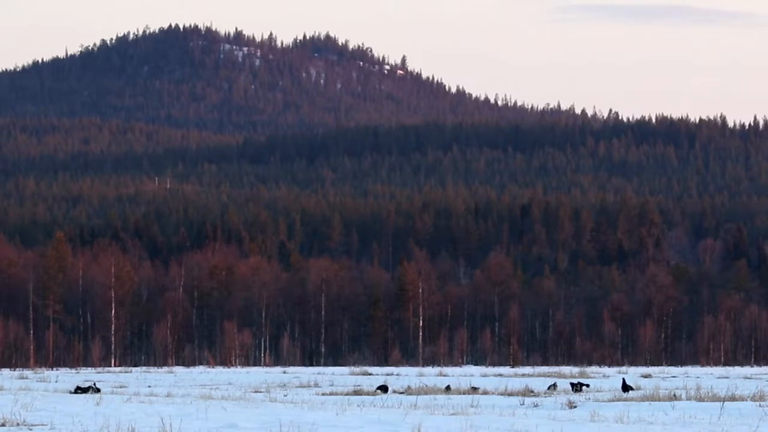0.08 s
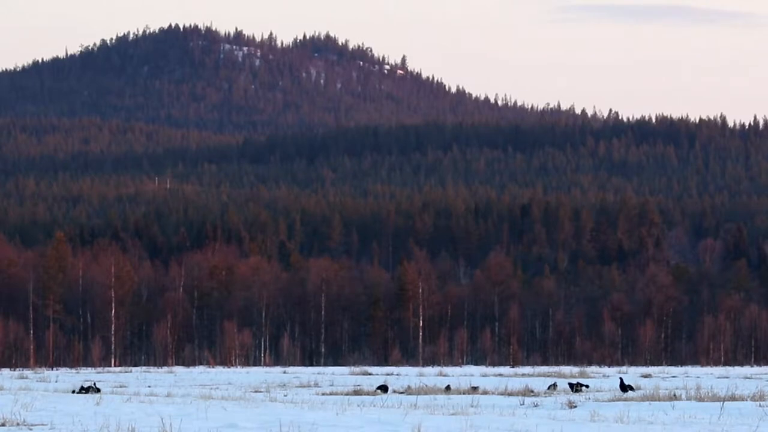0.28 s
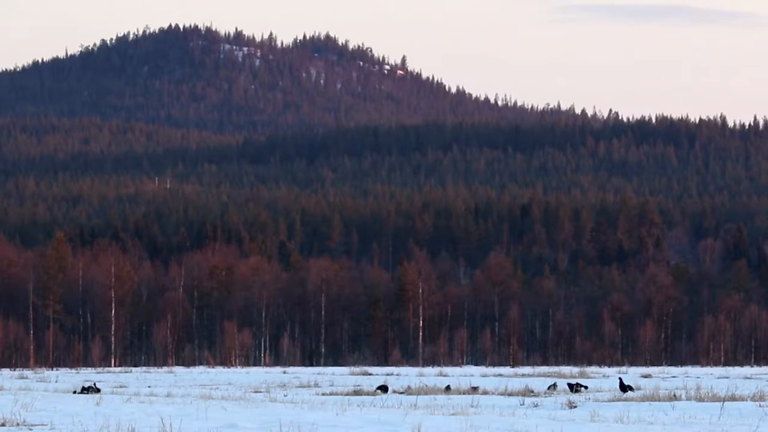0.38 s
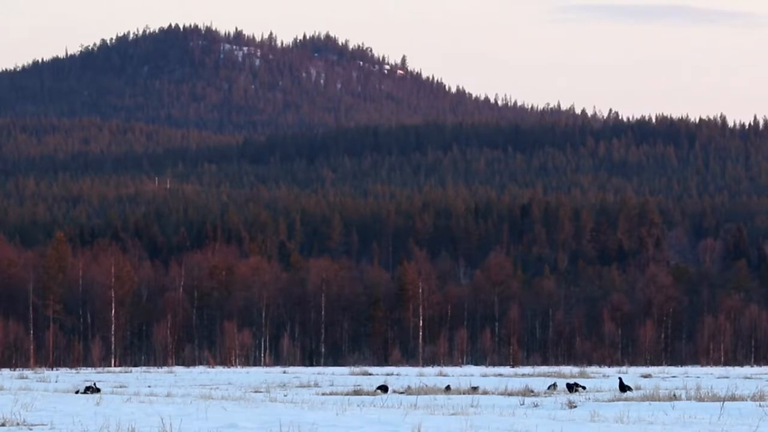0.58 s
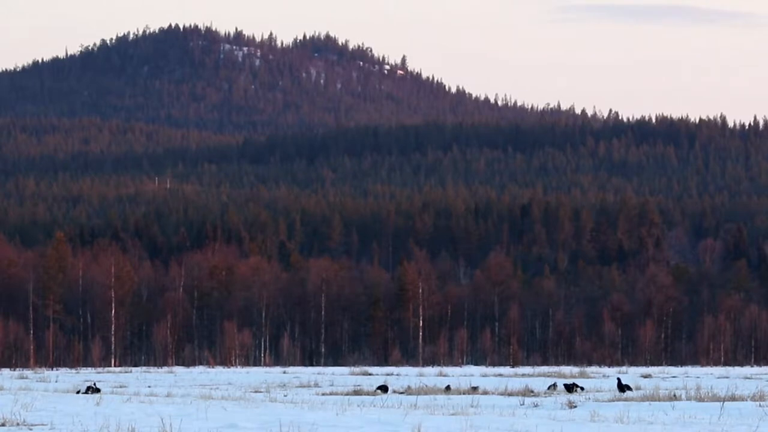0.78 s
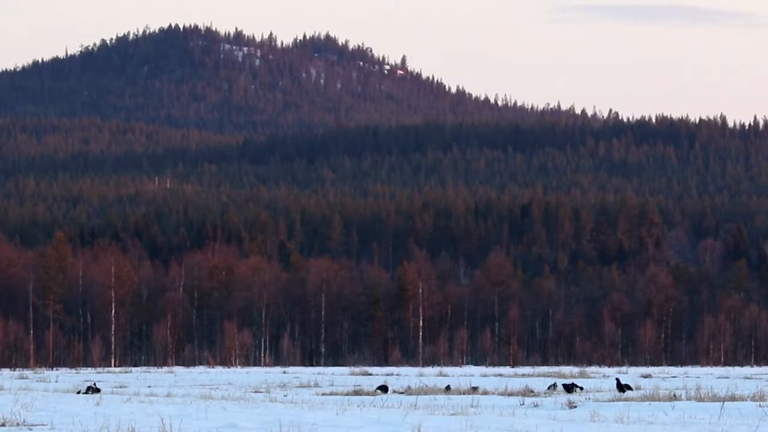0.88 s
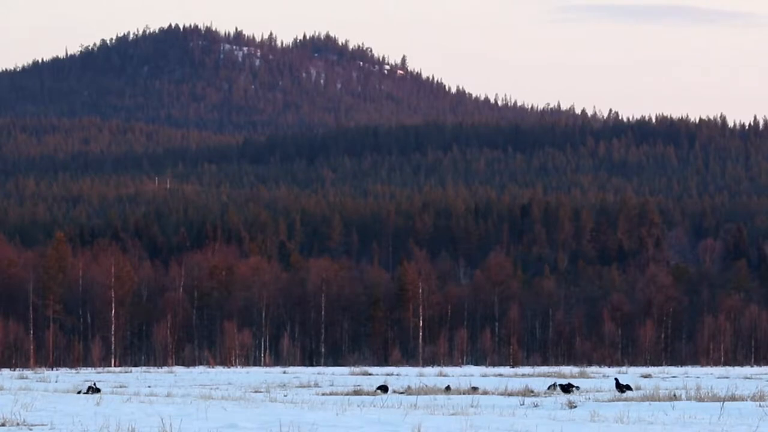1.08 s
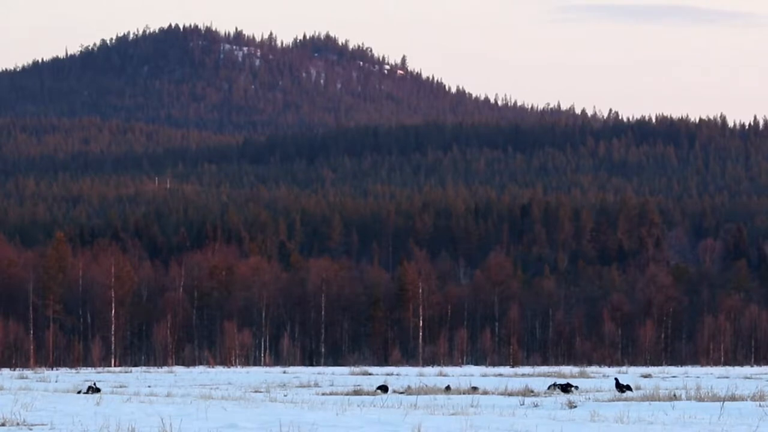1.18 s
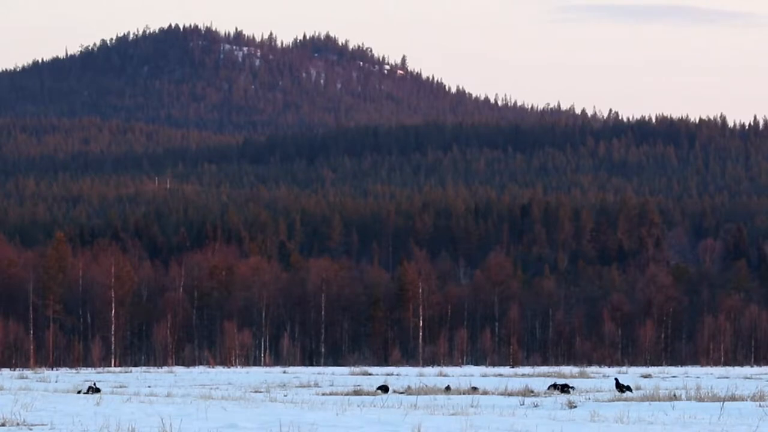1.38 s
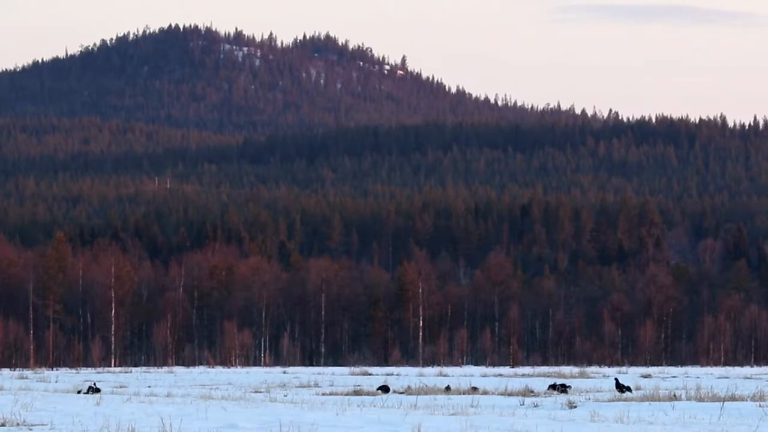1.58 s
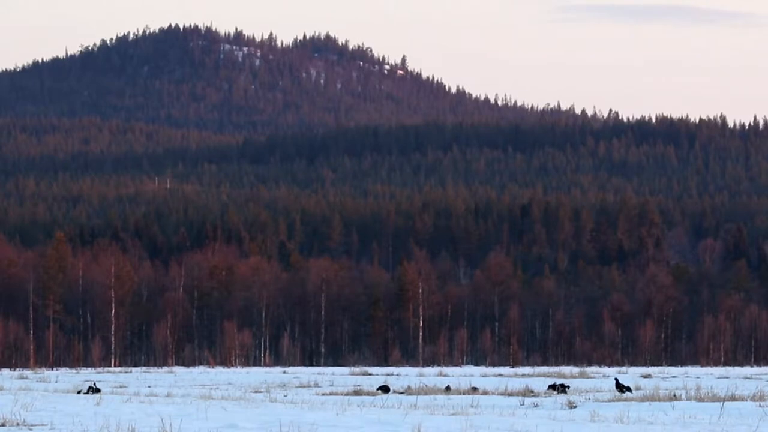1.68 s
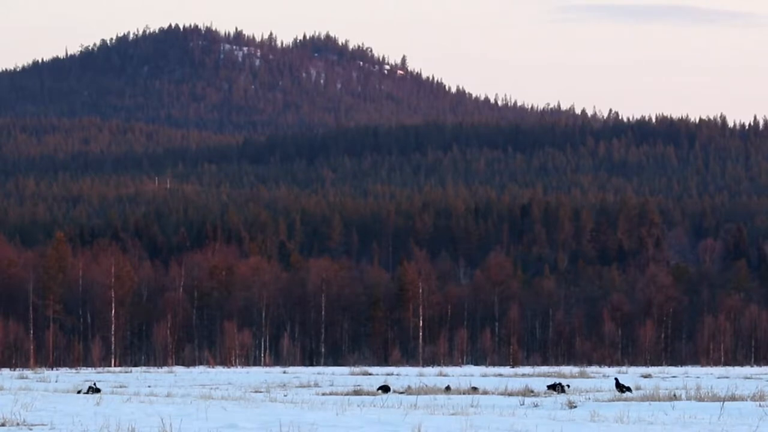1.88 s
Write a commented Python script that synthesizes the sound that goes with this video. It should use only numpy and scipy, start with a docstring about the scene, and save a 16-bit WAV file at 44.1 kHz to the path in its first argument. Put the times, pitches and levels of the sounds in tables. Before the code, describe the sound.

A male black grouse's hissing sneeze bursts in at 0.2 s, a rough breathy whistle sliding down and fading by 0.45 s, then swelling and climbing from 0.55 s, ending near 1.05 s. Throughout, another cock bubbles in short, low, pure coos, roughly fourteen a second, clearer and slightly stronger after 1.3 s. Random distant bubbling, faint far hisses near 0.1 and 1.3 s, low rumble, microphone hiss and soft forest echo.

```python
"""A black grouse cock gives a two-part hissing sneeze on a bog: a breathy, wavering whistle falls,
fades and climbs again, while three bands of shaped noise make the rush of air in his throat.
Another cock bubbles on in short gliding coos, each nearly a pure tone, with more birds behind at random.
Faint puffs of hiss come from afar. Filtered noise makes the low rumble, a far wash of hissing cocks
and steady microphone hiss; smeared noise echoes stand for the forest edge."""
import sys
import numpy as np
from scipy import signal
from scipy.fft import rfft, irfft
from scipy.io import wavfile

SR = 44100
rng = np.random.default_rng(int(sys.argv[2]) if len(sys.argv) > 2 else 0)


def waveform_to_disk(signal):
    """Save audio, clipped to [-1, 1], as 16-bit WAV at the path in sys.argv[1]."""
    frames = np.transpose(np.atleast_2d(signal))
    scaled = np.clip(frames, -1, 1) * 32767
    samples = np.round(scaled).astype(np.int16)
    wavfile.write(sys.argv[1], SR, samples)


N = 83790
TIME, BINS = np.arange(N) / SR, np.fft.rfftfreq(N, 1 / SR)


def amp(db):
    """Turns decibels into a gain."""
    return 10 ** (np.asarray(db) / 20)


def unit(x):
    """Scales a sound to an average (rms) strength of 1."""
    return x / np.sqrt(np.mean(abs(x) ** 2) + 1e-20)


def curve(table, axis):
    """Draws straight lines through one column of a time table, at every sample."""
    rows = np.array(table)
    return np.interp(TIME, rows[:, 0], rows[:, axis])


def colour(table, axis=1):
    """Joins one column of a frequency table on a log scale, at every frequency bin."""
    rows = np.array(table)
    return np.interp(np.log(BINS + 1), np.log(rows[:, 0] + 1), rows[:, axis])


def noise(table):
    """Random noise filtered to the table's balance of frequencies, at rms 1."""
    spectrum = rfft(rng.standard_normal(N))
    return unit(irfft(spectrum * amp(colour(table)), N))


def wander(hz):
    """A smooth random curve that moves at up to about hz, at rms 1."""
    spectrum = rfft(rng.standard_normal(N))
    return unit(irfft(spectrum / (1 + (BINS / hz) ** 2), N))


def turning(hz):
    """A complex wave of size 1 that turns at the given frequency, fixed or changing."""
    return np.exp(2j * np.pi * np.cumsum(hz * np.ones(N)) / SR)


def swell(middle, length):
    """A rounded rise and fall, silent outside its length in seconds."""
    return np.cos(np.pi * np.clip((TIME - middle) / length, -.5, .5))


ECHO_T60_S = 4  # time for the echo to fade by 60 dB


def forest(x):
    """The forest edge's diffuse echo: the sound smeared by fading noise, different on each side."""
    fade = amp(-60 * TIME / ECHO_T60_S)
    rise = np.minimum(TIME / 0.017, 1)
    tail = rng.standard_normal((2, N)) * fade * rise
    return signal.fftconvolve(x[None], tail / np.linalg.norm(tail[0]), axes=1)[:, :N]


# tone balance of the low outdoor rumble: (frequency [Hz], relative level per Hz [dB])
RUMBLE_COLOUR = [(15, 0.5), (35, -6), (60, 1.5), (110, -3), (200, -3), (300, 0), (450, 0), (700, -14),
                 (1000, -16.5), (1500, -16), (2200, -37), (5000, -46)]
# tone balance of each microphone's hiss: (frequency [Hz], relative level per Hz [dB])
HISS_COLOUR = [(20, 2), (100, 8), (400, 7.5), (1000, 4), (2500, -1), (5000, -1), (7000, 0), (9000, -2),
               (15500, -2)]
# tone balance of the far-off wash of other cocks hissing: (frequency [Hz], relative level per Hz [dB])
WASH_COLOUR = [(700, -32), (1050, -7), (1250, 4), (1430, 6), (1700, -5), (2000, -19), (2800, -24),
               (4000, -29)]
RUMBLE_DB, HISS_DB, WASH_DB = -40.5, -38.5, -48.5
RUMBLE_SIDE_DB = -18.5  # left-right difference, relative to the shared rumble


def background():
    """Steady filtered noise: a nearly mono rumble, with separate wash and hiss on each side."""
    side_rumble = noise(RUMBLE_COLOUR) * np.array([[1], [-1]])
    rumble = noise(RUMBLE_COLOUR) + amp(RUMBLE_SIDE_DB) * side_rumble
    hiss_and_wash = [amp(HISS_DB) * noise(HISS_COLOUR) + amp(WASH_DB) * noise(WASH_COLOUR)
                     for side in range(2)]
    return amp(RUMBLE_DB) * rumble + np.array(hiss_and_wash)


COO_JITTER, COO_OVERTONE_DB = .012, -30  # pitch wobble [fraction], level against the main tone


def coo(middle, length, hz, glide, db):
    """One nearly pure gliding note from the swollen throat, with a faint overtone at twice the pitch."""
    out = np.zeros(N)
    on = abs(TIME - middle) < length / 2
    t = TIME[on] - middle
    jitter = np.interp(t, np.linspace(-length / 2, length / 2, 8), rng.standard_normal(8))
    pitch = hz * 2 ** (glide * t) * (1 + COO_JITTER * jitter)
    phase = 2 * np.pi * (rng.random() + np.cumsum(pitch) / SR)
    tone = np.sin(phase) + amp(COO_OVERTONE_DB) * np.sin(2 * phase)
    out[on] = np.sqrt(2) * amp(db) * np.cos(np.pi * t / length) ** 1.45 * tone
    return out


# the near bird's coos:
# (middle time [s], length [s], pitch at the middle [Hz], glide [octaves/s], level before COO_DB [dB])
COO_NOTES = [(0.013, 0.038, 475.3, 13.5, -27), (.04, 0.031, 551, -3.5, -32.5),
             (.066, 0.028, 466, 20.5, -27.5), (0.118, 0.047, 458.5, -5, -28.5),
             (0.125, 0.035, 580, 0.5, -30.5), (0.206, .044, 590.5, 4, -28.5), (.245, .035, 497, 2, -40),
             (.281, 0.027, 454, -15, -34.5), (.321, 0.048, 513, -16.5, -27), (.387, 0.036, 455, -14, -37),
             (0.456, 0.046, 444, -8.5, -34.5), (.533, .045, 474.4, -5, -31), (0.599, .036, 431, -13, -30),
             (0.669, 0.033, 446, -13.5, -28.5), (.742, 0.031, 432, -6, -29.5),
             (0.816, 0.039, 419, -11.5, -31), (0.888, 0.047, 431.1, -3, -31), (.964, 0.037, 432, -13, -29),
             (1.036, 0.027, 424, -10.5, -29.5), (1.052, .04, 523, -5.5, -31.5),
             (1.105, 0.035, 444.3, -9.5, -28), (1.176, .036, 438, -11.5, -29),
             (1.255, 0.044, 442.3, -9, -28.5), (1.32, 0.039, 454.3, -5.5, -26),
             (1.397, 0.0341, 437.7, -12, -29), (1.473, 0.046, 453.3, -9, -26), (1.52, 0.024, 467, -1, -29),
             (1.556, 0.076, 460.7, -5.5, -26.5), (1.6, 0.025, 503, 10, -29.5),
             (1.633, 0.061, 465.7, -7, -25.5), (1.692, 0.034, 474, -8.5, -30), (1.745, .018, 453, 6, -29),
             (1.763, 0.022, 552, -10, -25.5), (1.824, .024, 450, 23, -28.5), (1.847, 0.046, 568.5, 3, -28),
             (1.882, 0.058, 509, -5.5, -30)]
COO_DB, COO_ECHO_DB = -1.5, -12  # gain of all the notes, echo against them


def bubbling():
    """The near bird's run of coos, a touch stronger on the right, with a forest echo."""
    notes = amp(COO_DB) * sum(coo(*row) for row in COO_NOTES)
    # one echo shared by both sides, plus a weaker one that differs between them
    echo = forest(notes)[0] + 0.48 * forest(notes)
    return notes * amp([[-.2], [.2]]) + amp(COO_ECHO_DB) * echo


CHORUS_PER_S, CHORUS_DB = 50, -42.5  # notes per second, overall level
CHORUS_HZ, CHORUS_SPREAD = 476, 0.1286  # middle pitch, random shift up or down [fraction]
CHORUS_S, CHORUS_GLIDE = .045, -5.5  # note length, glide [octaves/s]
CHORUS_PAN_DB = 7.5  # widest difference between left and right


def chorus():
    """Farther birds bubble at random times, pitches and strengths, spread from left to right."""
    notes = np.zeros((2, N))
    for at, pitch, far, side in rng.random((int(CHORUS_PER_S * N / SR), 4)):
        hz = CHORUS_HZ * (1 + CHORUS_SPREAD * (2 * pitch - 1))
        note = coo(at * N / SR, CHORUS_S, hz, CHORUS_GLIDE, -6 * far)
        notes += note * amp(CHORUS_PAN_DB * (side - .5) * np.array([[1], [-1]]))
    return amp(CHORUS_DB) * unit(notes)


# faint far sneezes and scuffles:
# (middle time [s], length [s], centre frequency [Hz], width [Hz], level before the swell [dB])
FAR_PUFFS = [(0.131, 0.03, 3200, 1500, -42), (1.317, .14, 1543, 600, -42.5), (1.465, .03, 2200, 1300, -46)]


def far_hisses():
    """Short puffs from across the bog: narrow random noise that swells and fades, separate on each side."""
    out = np.zeros((2, N))
    for middle, length, hz, width, db in FAR_PUFFS:
        sides = [unit((wander(width / 2) * turning(hz)).real) for side in range(2)]
        out += amp(db) * swell(middle, length) * np.array(sides)
    return out


CEILING_DB = -8.5  # the whistle and low throat sound saturate here


def saturate(x):
    """Holds the swing of a narrow-band sound softly under the ceiling."""
    swing = abs(signal.hilbert(x))
    return x / (1 + (swing / amp(CEILING_DB)) ** 8) ** (1 / 8)


# the sneeze's whistle: (time [s], pitch [Hz], level before saturation [dB])
WHISTLE_PATH = [(.198, 1640, -64), (.215, 1640, -18.5), (.24, 1580, -28), (.262, 1430, -18),
                (.29, 1311, -19.5), (.308, 1268, -12), (.328, 1210, -20), (.372, 1154, -20),
                (.385, 1142, -29), (.425, 1115, -33), (.5, 1133, -37), (.55, 1166, -31), (.6, 1249, -25.5),
                (.635, 1346, -18), (.705, 1425, -13.5), (.765, 1490, -16), (.79, 1520, -21),
                (.92, 1530, -29.5), (1.0, 1570, -35), (1.03, 1570, -74)]
WHISTLE_WIDTH_HZ, WHISTLE_SKIRT_HZ = 102, 177  # spread of the flutter, its low-pass limit
WHISTLE_STEADY = 0.38  # 0 leaves the flutter's strength random, 0.5 evens it out most


def breathy_whistle(hz):
    """A gliding tone only half locked to its pitch, because turbulent air drives it."""
    flutter = wander(WHISTLE_WIDTH_HZ / 2) + 1j * wander(WHISTLE_WIDTH_HZ / 2)
    flutter = flutter / (abs(flutter) ** 2 + 0.16) ** WHISTLE_STEADY
    flutter = signal.sosfilt(signal.butter(4, WHISTLE_SKIRT_HZ, fs=SR, output="sos"), flutter)
    return unit((flutter * turning(hz)).real) * amp(curve(WHISTLE_PATH, axis=2))


# air rushing through the throat, levels before the rasp:
# (time [s], low resonance level [dB], upper resonance level [dB], fizz level [dB])
AIR_LEVELS = [(.178, -78, -56.5, -53), (.198, -35, -35, -45), (.215, -24.5, -29, -40.5),
              (.245, -20.5, -30.5, -38), (.29, -22.5, -40.5, -36.5), (.36, -30.5, -41.5, -39.5),
              (.41, -37.5, -50, -45), (.52, -41, -50.5, -48.5), (.58, -30.5, -49, -44.5),
              (.68, -25, -39.5, -40), (.78, -21.5, -41, -39.5), (.825, -20.5, -37.5, -40.5),
              (.87, -26, -35.5, -41.5), (.94, -26, -33, -42), (1.005, -30.5, -35.5, -46),
              (1.045, -45, -48.5, -60), (1.1, -73, -73, -70)]
# tone balance of the low throat resonance: (frequency [Hz], relative level [dB])
THROAT_COLOUR = [(600, -34), (930, -33), (1100, -14.5), (1300, -2.5), (1480, 0.5), (1700, -2.5),
                 (1830, -8.5), (1980, -29), (2300, -52), (3000, -57)]
# tone balance of the upper resonance: (frequency [Hz], relative level [dB])
UPPER_COLOUR = [(1700, -32), (2000, -8.5), (2280, -12), (2580, 1.5), (2850, -1.5), (3150, -6.5),
                (3500, -17), (4500, -31.5)]
# tone balance of the high fizz: (frequency [Hz], relative level [dB])
FIZZ_COLOUR = [(2200, -17), (3000, -4), (3700, 1.5), (4250, 1), (4750, 0.5), (5000, -3), (5350, -11.5),
               (6200, -14), (9000, -28), (14000, -58)]
# where the sneezing cock stands: (frequency [Hz], left lead [rad], left minus right [dB])
COCK_PLACE = [(500, 0, -0.5), (1400, -0.12, 1.1), (2730, -0.61, .9), (4200, -1.06, -1.6), (8000, -1.2, -1)]
THROAT_FOLLOW, THROAT_REST_HZ = 0.33, 1491  # share of the whistle's glide, pitch that gives no shift
RASP_DB, RASP_HZ = 1, 89  # depth (rms) and speed of the roughness
SNEEZE_ECHO_DB = -26


def sneeze():
    """Turbulent air drives a gliding, half-locked whistle and three broad throat resonances."""
    hz = curve(WHISTLE_PATH, axis=1)
    whistle = breathy_whistle(hz)
    # the low resonance leans with the whistle
    throat_shift = turning(THROAT_FOLLOW * (hz - THROAT_REST_HZ))
    throat = (signal.hilbert(noise(THROAT_COLOUR)) * throat_shift).real * amp(curve(AIR_LEVELS, axis=1))
    upper = noise(UPPER_COLOUR) * amp(curve(AIR_LEVELS, axis=2))
    fizz = noise(FIZZ_COLOUR) * amp(curve(AIR_LEVELS, axis=3))
    rasp = unit(amp(RASP_DB * wander(RASP_HZ)))
    call = saturate(whistle + rasp * throat) + rasp * (upper + fizz)
    # half of each left-right difference goes to either side
    lean = np.exp(.5j * colour(COCK_PLACE, axis=1)) * amp(colour(COCK_PLACE, axis=2) / 2)
    placed = irfft(rfft(call) * np.array([lean, 1 / lean]), N)
    return placed + amp(SNEEZE_ECHO_DB) * forest(call)


def scene():
    """All the birds over the quiet of the bog."""
    return background() + bubbling() + chorus() + far_hisses() + sneeze()


EDGE_HZ = 15900  # upper frequency limit


def record(dry):
    """The recorder's band limit: a low-pass filter removes the highest frequencies."""
    lowpass = signal.firwin(511, EDGE_HZ, window=("kaiser", 9), fs=SR)
    return signal.oaconvolve(dry, lowpass[None], "same")


dry = scene()
out = record(dry)
waveform_to_disk(out)
```